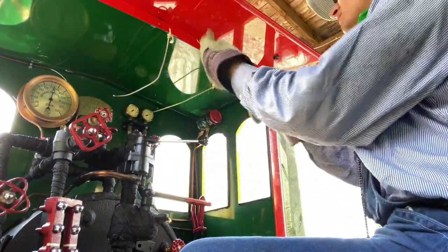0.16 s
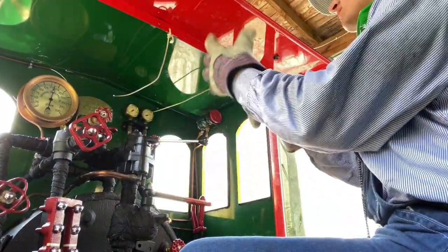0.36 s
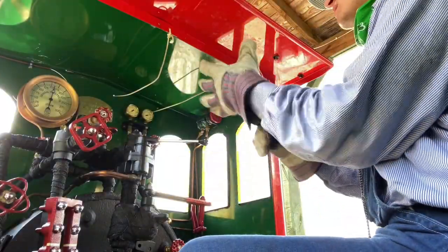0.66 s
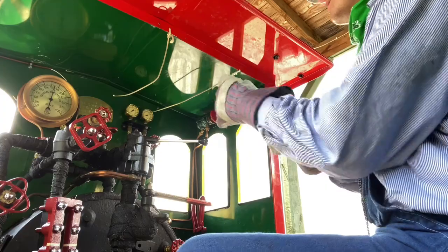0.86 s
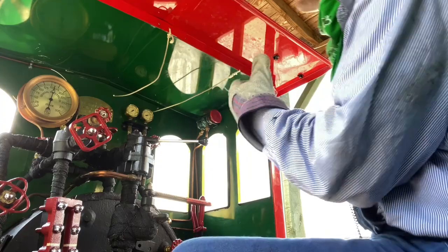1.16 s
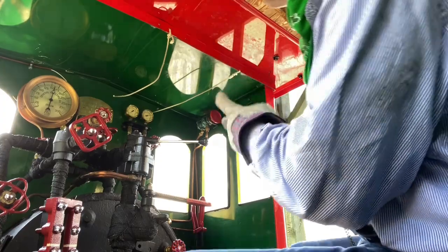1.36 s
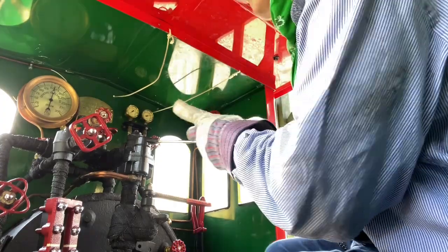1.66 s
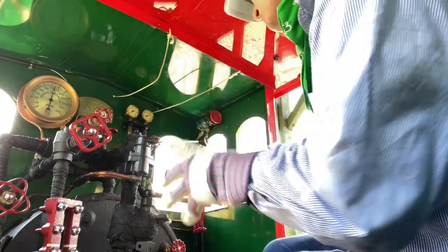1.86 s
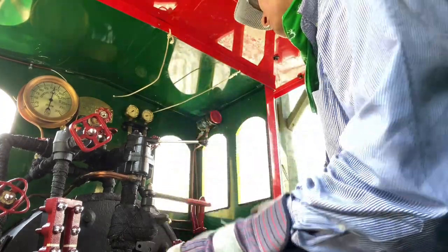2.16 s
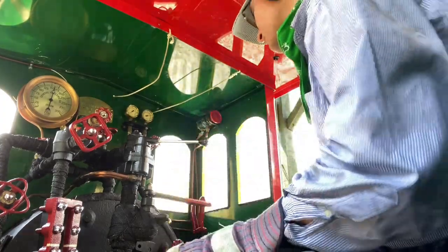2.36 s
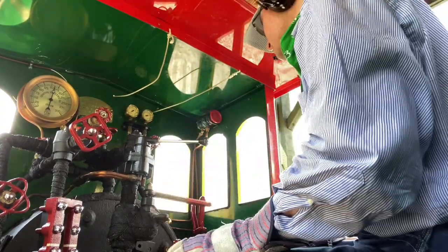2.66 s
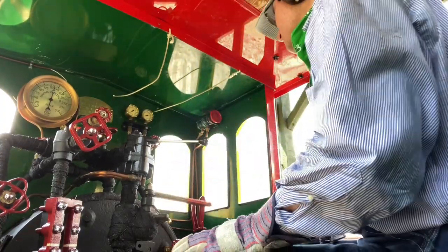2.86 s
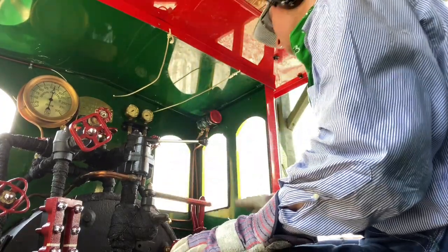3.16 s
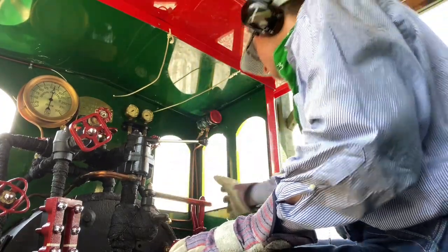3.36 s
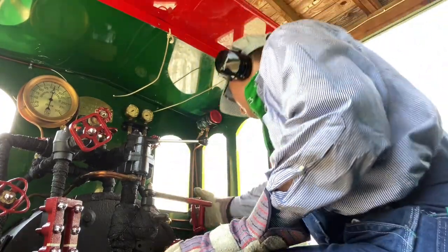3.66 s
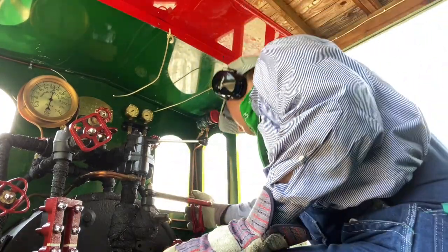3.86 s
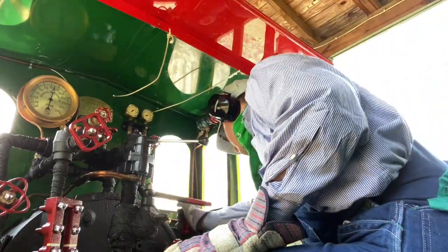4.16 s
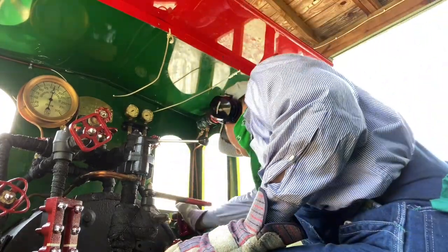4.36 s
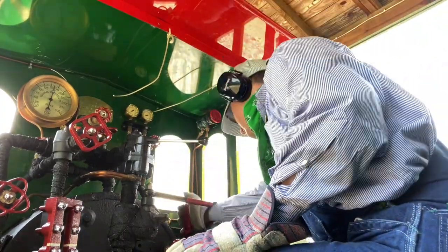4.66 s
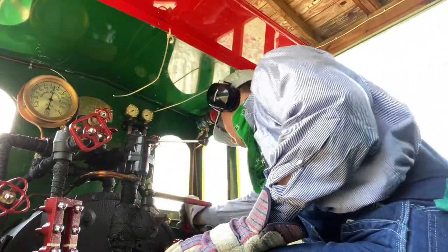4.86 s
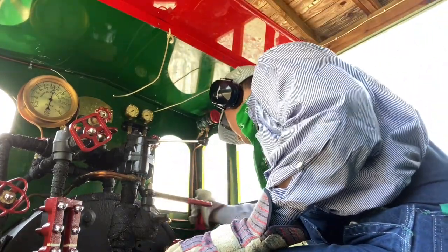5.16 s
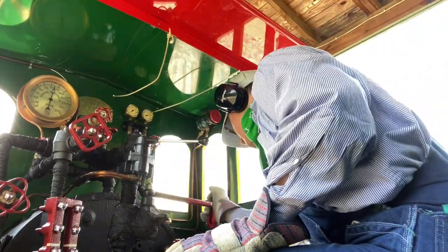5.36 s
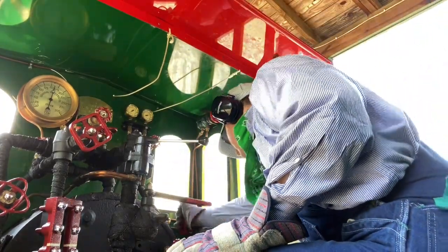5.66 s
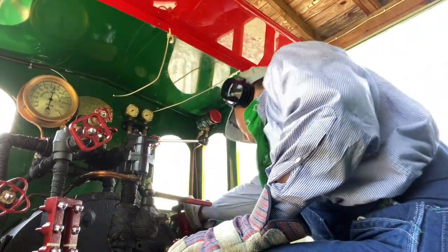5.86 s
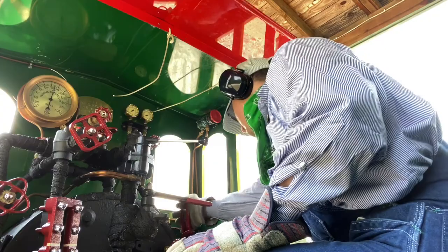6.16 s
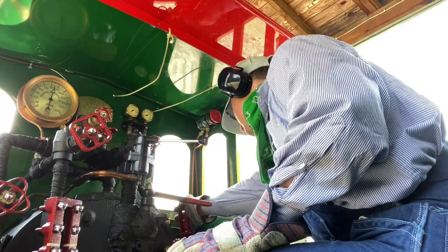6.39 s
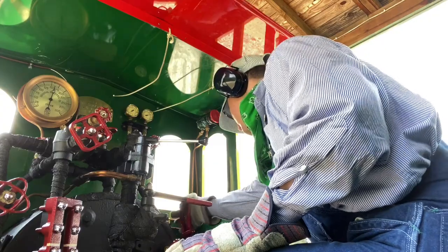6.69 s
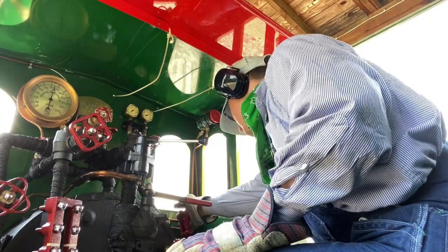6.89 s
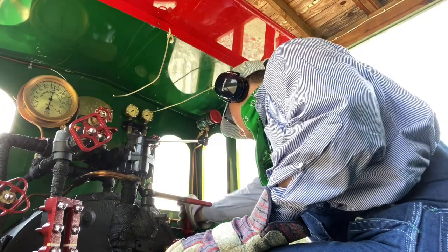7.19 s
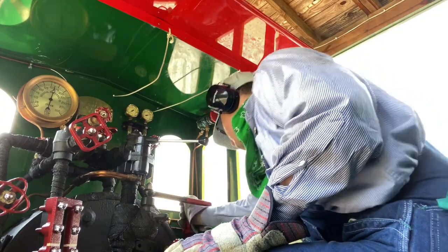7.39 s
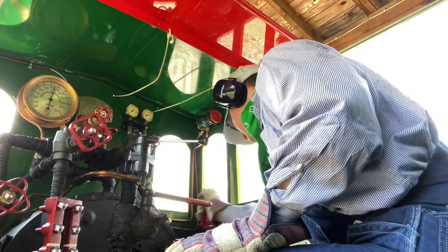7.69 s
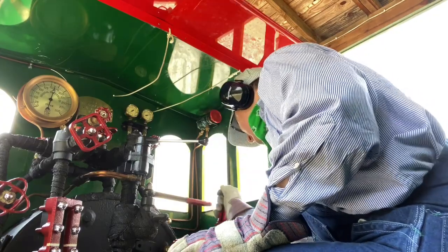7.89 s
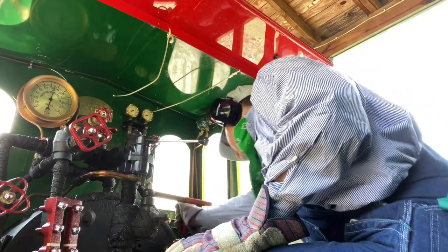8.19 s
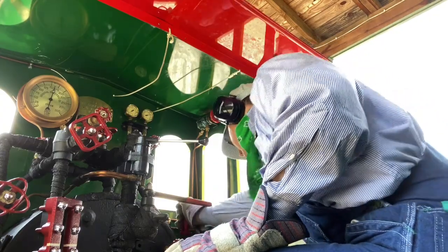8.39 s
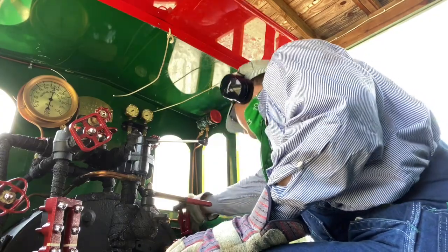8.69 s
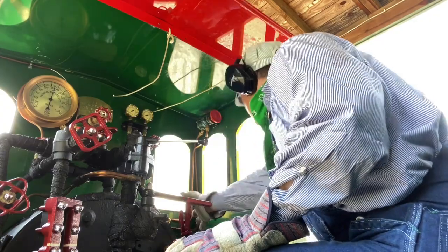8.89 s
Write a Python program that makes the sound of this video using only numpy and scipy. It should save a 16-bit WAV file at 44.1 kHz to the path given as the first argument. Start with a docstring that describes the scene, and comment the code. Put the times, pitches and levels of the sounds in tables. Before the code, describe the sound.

Inside a small standing steam locomotive, the firebox throbs and hums under soft steam hiss while valve gear clacks a few times, loudest near the end.

```python
"""Cab of a small standing steam locomotive

The fire is lit: its flame rumbles in the firebox, hot gas roars and hums in the tubes, and steam hisses from
the fittings; a hand on the valve gear makes a few dull metal knocks. Fire, gas and steam are shaped noise,
a knock is a noise burst with damped modes. Two close microphone ports hear the bass nearly alike and the
treble shifted in phase."""
import sys
import numpy as np
from scipy import signal
from scipy.fft import rfft, irfft, next_fast_len
from scipy.io import wavfile
from scipy.ndimage import uniform_filter1d

SR = 44100
rng = np.random.default_rng(int(sys.argv[2]) if len(sys.argv) > 2 else 0)


def generate_wav(sig):
    """Save sig (samples, or channels by samples) to the path in sys.argv[1] as 16-bit PCM at SR."""
    pcm = np.round(np.clip(np.atleast_2d(sig).T, -1, 1) * 32767).astype(np.int16)
    wavfile.write(sys.argv[1], SR, pcm)


N = 398663  # length [samples]

# How the two microphone ports differ:
# (frequency [Hz], likeness [0-1], phase by which left leads [rad], left minus right [dB])
PORT_PAIR = [(60, .998, .08, -.5), (300, .99, .08, -1), (410, .96, -.1, -2), (450, .97, .3, -2.5),
             (500, .9, -.6, -3), (540, .4, -1.7, -4), (600, .5, .5, -2), (720, .85, 1.9, 0),
             (880, .45, 2.4, 0), (1000, .75, 2.9, 2.5), (1400, .85, 1.9, 3), (1700, .82, 2.2, 4),
             (2000, .7, -.4, 5), (2350, .2, 0, 3), (2700, .8, .3, 4), (3100, .5, 1.8, 4),
             (4000, .3, 2.5, 1.5), (6300, .2, 4.5, .5), (7500, .7, 6.1, 0), (8600, .92, 6.4, 0),
             (10400, .98, 9.4, 0), (13100, .98, 12.6, 0), (15500, .98, 15.7, 0)]


def amp(db):
    """Turn a level in dB into a gain."""
    return 10 ** (np.asarray(db) / 20)


def unit(x):
    """Scale x to an rms of 1."""
    return x / np.sqrt(np.mean(x ** 2) + 1e-20)


def along(points, hz):
    """Read a curve of (frequency [Hz], value) points on a log frequency axis."""
    point_hz, value = np.transpose(points)
    return np.interp(np.log(hz + 1), np.log(point_hz + 1), value)


def curves(rows):
    """Draw one curve, with a value per sample, for each column after the time."""
    time_s, *columns = np.transpose(rows)
    return [np.interp(np.arange(N) / SR, time_s, column) for column in columns]


def filtered(x, response):
    """Multiply the spectrum of x by a response that depends on frequency."""
    size = next_fast_len(x.shape[-1] + 8192)
    spectrum = rfft(x, size) * response(np.fft.rfftfreq(size, 1 / SR))
    return irfft(spectrum, size)[..., :x.shape[-1]]


def at_ports(n, gain):
    """Make noise as two ports hear it: a shared part turned in phase, and a part of the right port's own."""
    port_hz, likeness, lead, pan_db = np.transpose(PORT_PAIR)
    size = next_fast_len(n + 8192)
    hz = np.fft.rfftfreq(size, 1 / SR)
    share = np.clip(np.interp(hz, port_hz, likeness), 0, 1)
    # Half of the phase and level difference goes to each side.
    turn = np.exp(.5j * np.interp(hz, port_hz, lead)) * amp(np.interp(hz, port_hz, pan_db) / 2)
    # The gain is worked out at every eighth frequency and held in between.
    level = np.repeat(gain(hz[::8]), 8, axis=-1)[..., :len(hz)]
    both, own = rfft(rng.standard_normal((2, n)), size)
    left = turn * both
    right = (share * both + np.sqrt(1 - share ** 2) * own) / turn
    return unit(irfft(level * np.array([left, right]), size)[:, :n])


def resonance_peaks(hz, modes, power):
    """Add up bell-shaped resonances, with the left and right heights raised to a power."""
    return sum(amp([[left], [right]]) ** power / (1 + (2 * (hz - centre) / width) ** 2)
               for centre, width, left, right in modes)


def resonant(spectrum, modes):
    """Give the left and right gain of a smooth spectrum with resonances standing on it."""
    def gain(hz):
        return amp(along(spectrum, hz)) * np.sqrt(1 + resonance_peaks(hz, modes, power=2))
    return gain


def patchy(x, patchy_db):
    """Vary the gain in random patches of time and frequency, as turbulence comes and goes."""
    z = signal.stft(x, nperseg=512)[2]
    field = uniform_filter1d(rng.standard_normal(z.shape[1:]), 5, 0)  # smooth over frequency
    field = uniform_filter1d(field, 8, 1)  # smooth over time
    return unit(signal.istft(z * amp(patchy_db * unit(field)), nperseg=512)[1][:, :N])


def steadied(x, steady, span_s):
    """Partly even out the slow chance swells of a noise."""
    swell = uniform_filter1d((x ** 2).mean(0), int(span_s * SR))
    swell = uniform_filter1d(swell, int(span_s * SR / 2))
    return unit(x / (abs(swell) + .02) ** (steady / 2))


def steam_hiss():
    """Steam escaping through small leaks makes turbulent noise, with whistling peaks at some leaks."""
    # Smooth spectrum of the hiss: (frequency [Hz], relative level per Hz [dB])
    hiss_spectrum = [(1200, -85), (2000, -62), (2350, -66), (2700, -58), (3300, -59), (3800, -67),
                     (5200, -70), (6600, -70), (7900, -66), (8800, -71), (9500, -71.5), (11300, -76.5),
                     (12500, -75.5), (14900, -83), (15500, -79)]
    # Whistling leaks, as peaks over that spectrum:
    # (frequency [Hz], width [Hz], left [dB], right [dB])
    whistles = [(2150, 22, -4.5, 16), (2650, 34, 8.5, -4), (2900, 25, 5, 4.5), (3064, 42, 3, 0),
                (3317, 19, 6.5, 12.5), (4217, 183, 7, 8.5), (4500, 53, 12.5, -13), (4950, 30, 7.5, 13),
                (5620, 42, 13, 12), (6000, 155, 6.5, 7), (13300, 100, 5, 5)]
    # Level of the hiss: (time [s], level [dB])
    hiss_level = [(0, -34), (2.5, -34), (4, -33.5), (6, -33.5), (7.5, -33.5), (9.04, -34)]
    hiss = patchy(at_ports(N, resonant(hiss_spectrum, whistles)), patchy_db=1.35)
    return amp(curves(hiss_level)[0]) * hiss


def draught(level_db=-21.5):
    """Hot gas roars through the tubes: turbulent noise at a steady level, coloured by resonances."""
    # Smooth spectrum of the roar: (frequency [Hz], relative level per Hz [dB])
    roar_spectrum = [(15, -48), (35, -54), (70, -38), (112, -34), (140, -34), (165, -49.5), (190, -52),
                     (210, -41), (330, -42), (405, -52), (432, -47), (455, -43), (620, -55.5),
                     (1000, -49.5), (1500, -57.5), (2300, -72), (3000, -100)]
    # Resonances of tubes and cab panels, as peaks over that spectrum:
    # (frequency [Hz], width [Hz], left [dB], right [dB])
    tube_modes = [(227.5, 55, 3, 4.5), (286.5, 45, 6.5, 4), (474.7, 17.7, 9.5, 15.5), (557.4, 38, 2.5, 17),
                  (720, 16, 15, 12), (866, 18, 14, 9), (953, 7.8, 6.5, -14), (993, 20, -6, -4.5),
                  (988, 26, 8, 10), (1073, 31, 10, 11), (1152, 22, 11, 11), (1196, 8, 11.5, 5),
                  (1300, 20, 4.5, 7), (1405, 19.5, 10.5, 8), (1410, 26, 7, 10.5), (1560, 32, 9, 10),
                  (1665, 22, 7, 9), (1716, 53, 16, 13), (1847, 26, 16.5, 2), (1958, 21, 15, -2),
                  (2060, 20, 12, -1)]
    return amp(level_db) * patchy(at_ports(N, resonant(roar_spectrum, tube_modes)), patchy_db=1.57)


def hums():
    """The strongest tube resonances hum: narrow bands of noise, each with its own changing level."""
    # Levels of five tones, low to high:
    # (time [s], level [dB], level [dB], level [dB], level [dB], level [dB])
    hum_levels = [(0, -29.5, -36, -23, -42, -31), (1.1, -33.5, -40, -30.5, -64, -34.5),
                  (1.4, -24.5, -43, -21, -49, -29), (2, -25.5, -39, -22.5, -40, -32.5),
                  (2.4, -26, -36, -31, -44, -33), (2.95, -28, -39, -25, -46, -33.5),
                  (3.6, -23.5, -27.5, -27.5, -39, -31.5), (4.1, -28.5, -32.5, -24, -31.5, -37),
                  (4.8, -29, -25, -26.5, -37.5, -31.5), (5.6, -24, -34, -26, -34, -35.5),
                  (6.15, -32, -30.5, -32.5, -36, -33.5), (6.55, -23, -46, -26.5, -41, -32.5),
                  (7.3, -33.5, -28, -25, -31.5, -34.5), (7.75, -23, -31, -26.5, -32, -32),
                  (8.5, -26.5, -33, -31, -34.5, -34.5), (9.04, -28.5, -27, -29, -37, -34.5)]
    # Resonances that make up each tone: (frequency [Hz], width [Hz], left [dB], right [dB])
    hum_peaks = [
        [(380, 26.4, 3.5, 5), (352.8, 25, -5, -4.5)],
        [(405.6, 20, 5, 5)],
        [(499.5, 11.3, 0.5, 3.5)],
        [(596, 52, 3.5, -5), (695, 46, 5, -2.5)],
        [(720, 28, 1, -7), (783, 37, -10, 4.5), (814.4, 30, -24, 4.5)],
    ]
    total = 0
    for level_db, modes in zip(curves(hum_levels), hum_peaks):
        tone = at_ports(N, lambda hz: resonance_peaks(hz, modes, power=1))
        total = total + amp(level_db) * steadied(tone, steady=0.62, span_s=0.27)
    return total


def flame(skirt_hz=46, lopsided=0.098):
    """Combustion noise fills the firebox's lowest modes; it throbs by chance and swells slowly.
    Strong surges push harder than they pull, which adds overtones in step with them."""
    # Spectrum of the firebox: (frequency [Hz], relative level per Hz [dB])
    firebox_spectrum = [(15, -33), (36, -23), (50, -6), (60, 3.5), (75, -0.5), (94, 0), (108, -14.5),
                        (140, -18.5), (170, -31), (250, -120)]
    # Slow swell of the rumble, before the lowest bass is cut: (time [s], level [dB])
    flame_level = [(0, -15), (.4, -12.5), (1.3, -16), (1.8, -14), (2.7, -17.5), (3.3, -13), (3.9, -14.5),
                   (4.3, -16.5), (5.5, -13), (5.9, -17.5), (6.4, -12.5), (7.1, -17.5), (8.2, -14.5),
                   (8.7, -13.5), (9.04, -18)]
    boom = at_ports(N, lambda hz: amp(along(firebox_spectrum, hz)))
    boom = steadied(boom, steady=0.23, span_s=0.3)
    boom = amp(curves(flame_level)[0]) * unit(boom + lopsided * boom ** 2)
    # The small boiler radiates little below its lowest mode.
    return filtered(boom, lambda hz: 1 / np.sqrt(1 + (skirt_hz / (hz + 1)) ** 6))


def ringing(thud_db, thud_hz, ring_db, ring_hz, chatter_s, t):
    """Struck metal rings in damped modes, strongest near the blow's thud and ring centres.
    A first contact and a chatter of smaller ones set them going."""
    # Modes of the valve gear:
    # (frequency [Hz], relative level [dB], time to fall by 60 dB [s], left minus right [dB])
    gear_modes = [(524, 1, 0.08, -3), (580, 3.5, 0.065, -3), (655, 0, 0.075, -7), (730, 3, 0.1, -6),
                  (810, 1.5, 0.13, -7), (1200, 3, 0.08, 3), (1350, 1, .06, 4), (1520, 2, 0.06, 5),
                  (1630, -2, .05, 6), (1742, 2, 0.07, 10), (1850, -3, 0.05, 6), (1965, 0, 0.075, 5),
                  (2040, -6, 0.13, 4), (2630, -5, .04, -2), (3380, -8, .035, 0), (3600, -9, 0.035, 4),
                  (3830, -6, .035, 10), (4120, -5, 0.035, 5), (4400, -6, .035, 4), (4750, -9, .03, 3),
                  (5800, -13, .03, 0), (7900, -10, .025, 0)]
    hz, db, t60, pan_db = np.transpose(gear_modes)[:, :, None, None]
    low = hz < 1000  # these modes make the thud, the others the ring

    # Modes away from the centre are weaker, by 10 dB at most.
    octaves_off = np.log2(hz / np.where(low, thud_hz, ring_hz))
    off_db = np.minimum(120 * octaves_off ** 2, 10)
    db = db + np.where(low, thud_db, ring_db) - off_db
    db = db + rng.normal(0, 2, hz.shape)  # no two blows are quite alike

    port_hz, _, lead, _ = np.transpose(PORT_PAIR)
    turn = np.array([[0.47], [-0.47]]) * np.interp(hz, port_hz, lead)
    cycles = hz * t + rng.random(hz.shape)
    modes = amp(db - 60 * t / t60) * np.sin(2 * np.pi * cycles + turn)
    modes = modes * amp(np.array([[.5], [-.5]]) * pan_db)

    # Cubed noise is spiky, like many small contacts.
    chatter = unit(rng.standard_normal(len(t)) ** 3) * amp(-60 * t / chatter_s)
    chatter = chatter + 16.8 * (t == 0)  # the first contact
    rattled = signal.fftconvolve(modes, chatter[None, None], axes=2)[..., :len(t)]

    def energy(x):
        return np.linalg.norm(x, axis=(1, 2), keepdims=True)

    # The chatter spreads each mode's energy in time but does not change its amount.
    return (rattled * energy(modes) / energy(rattled)).sum(0)


def knocks():
    """Each blow on the valve gear is a fading crack of noise and a damped ring of the metal."""
    # Blows: (time [s], strength [dB], thud [dB], thud centre [Hz], ring [dB], ring centre [Hz],
    # treble tilt of the crack [dB per octave], boost of its top treble [dB],
    # time for the crack to fall by 60 dB [s], the same for the chatter [s], left minus right [dB])
    blows = [(3.8694, -31, 0, 640, -3, 3900, 7, -6, 0.072, .05, 3),
             (4.2615, -25.5, 1, 645, 2.5, 1770, 2, -4, 0.17, 0.07, -3),
             (4.6694, -22, -3, 645, -16, 1850, 4, 6, 0.049, 0.05, 0),
             (5.5243, -31, 7, 740, 11, 2630, 7, 2, 0.13, 0.074, -1),
             (5.5585, -26.5, 2, 655, 1, 1980, -4, 4, 0.17, 0.045, -2),
             (5.5596, -34, -9, 660, 9, 3550, 0, 0, 0.05, .04, -3),
             (5.578, -28.5, 9.5, 810, 0.5, 1700, -3, 12, 0.2, 0.11, -3),
             (5.598, -35, 13, 640, -3, 1250, -2, 0, 0.1, 0.092, 2),
             (5.807, -18.5, -9, 800, -1, 4100, 4, 3, 0.078, 0.094, -1),
             (5.813, -30, 0, 800, 6, 1590, -4, 0, 0.12, 0.11, -4),
             (7.7955, -25, -2, 560, 2.5, 2050, 5, -8, 0.061, .02, 9),
             (7.798, -15, 8.5, 610, 5.5, 1800, 12, -9, 0.098, 0.086, -1),
             (8.133, -24, -8, 650, -13, 2630, 9, -12, 0.13, .05, 1),
             (8.1415, -33, -9, 600, 7.5, 2000, -13, 0, 0.05, 0.022, 0),
             (8.1432, -19.5, 10.5, 620, 5, 1740, -0.5, -12, 0.25, 0.093, 0.5),
             (8.16, -24, 12, 740, -2, 1510, -2, -10, 0.16, 0.061, -2),
             (8.1794, -19, 2, 720, -12, 1500, -7, 0, 0.1, 0.075, 1),
             (8.201, -27, 8.5, 595, -12, 1500, -5, 0, 0.06, .02, -3),
             (8.4095, -22, -15, 730, -11, 1960, 6, 3, 0.04, .03, -2),
             (8.4118, -12, -17, 730, 2.5, 4100, 8.5, 7, 0.086, 0.14, 1.5),
             (8.4135, -30, 1, 730, 10.5, 1690, -2, 0, 0.23, 0.14, -3),
             (8.4185, -27, 13.5, 730, 1, 1490, -11, 0, 0.18, 0.11, 1)]
    # Spectrum of the crack before tilt and boost: (frequency [Hz], relative level per Hz [dB])
    crack_spectrum = [(300, -45), (1000, 6), (1700, -8.5), (2350, -1), (3600, 2), (5000, -8.5),
                      (7500, -10.5), (10000, -26), (12500, -33), (15800, -40)]
    out = np.zeros((2, N + SR))
    t = np.arange(SR // 6) / SR
    for (start_s, db, thud_db, thud_hz, ring_db, ring_hz,
         tilt_db, top_db, t60, chatter_s, pan_db) in blows:
        def colour(hz):
            tilt = tilt_db * np.log2((hz + 1) / 4000)
            top = top_db / (1 + (10000 / (hz + 1)) ** 10)
            return amp(along(crack_spectrum, hz) + tilt + top)

        crack = at_ports(len(t), colour) * amp(-60 * t / t60)
        ring = ringing(thud_db, thud_hz, ring_db, ring_hz, chatter_s, t)
        onset = 1 - np.exp(-t / 0.0012)  # softens the first moment of the blow
        blow = amp(db) * onset * (crack + ring)
        start = round(start_s * SR)
        out[:, start:start + len(t)] += blow * amp([[pan_db / 2], [-pan_db / 2]])
    return out[:, :N]


def scene():
    """Add up steam, hot gas, fire and knocks."""
    return steam_hiss() + draught() + hums() + flame() + knocks()


def record(dry, knee_db=-17, squeeze=0.33, recover_db=4.5, top_hz=15800):
    """Gain control ducks at loud mid and treble sound and creeps back; then soft clipping and a treble limit."""
    heard = filtered(dry, lambda hz: hz / np.hypot(hz, 900))  # the control hears less bass
    power = uniform_filter1d((heard ** 2).mean(0), SR // 100)
    level_db = 10 * np.log10(abs(power) + 1e-12)
    need_db = -squeeze * np.maximum(level_db - knee_db, 0)
    ramp = recover_db * np.arange(N) / SR  # before smoothing, the gain rises at most recover_db per second
    gain_db = np.minimum(ramp + np.minimum.accumulate(need_db - ramp), 0)
    gain_db = uniform_filter1d(gain_db, SR // 50)
    wet = dry * amp(gain_db)
    wet = wet / (1 + abs(wet) ** 8) ** (1 / 8)  # rounds off peaks near full scale
    return filtered(wet, lambda hz: hz < top_hz)


dry = scene()
out = record(dry)
generate_wav(out)
```